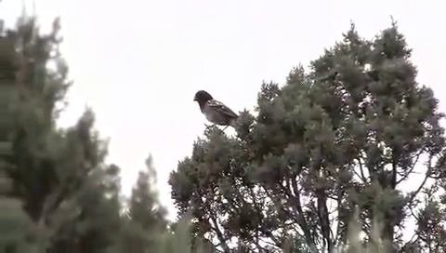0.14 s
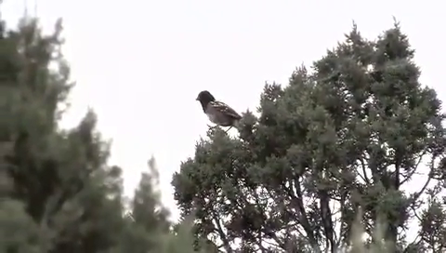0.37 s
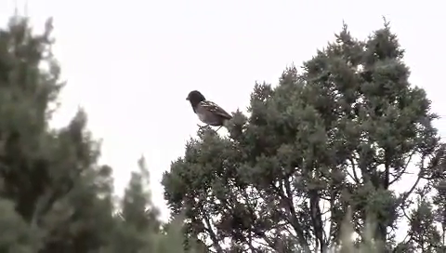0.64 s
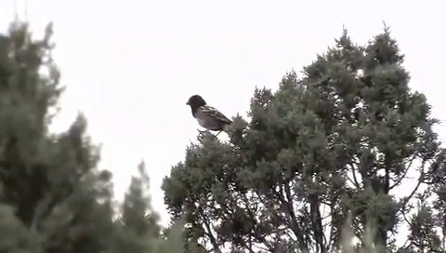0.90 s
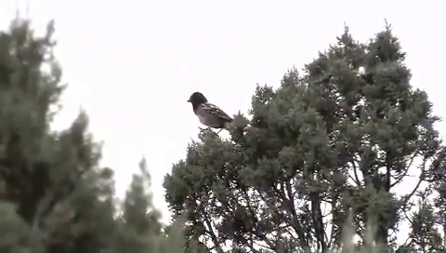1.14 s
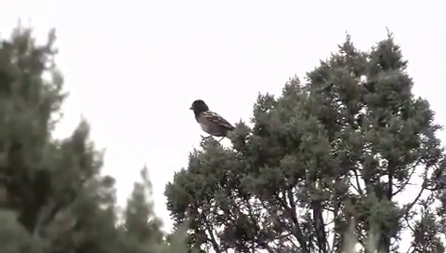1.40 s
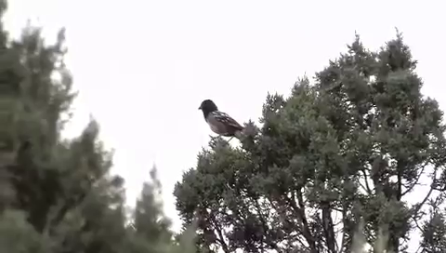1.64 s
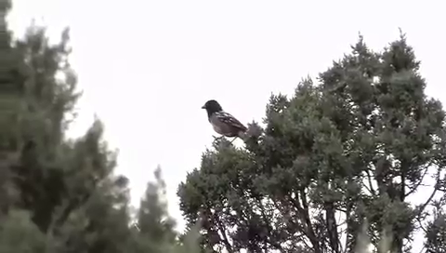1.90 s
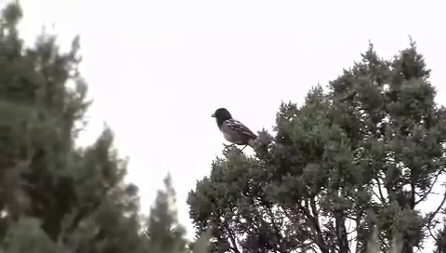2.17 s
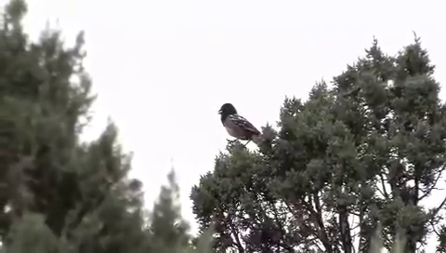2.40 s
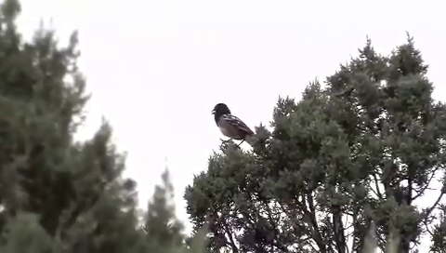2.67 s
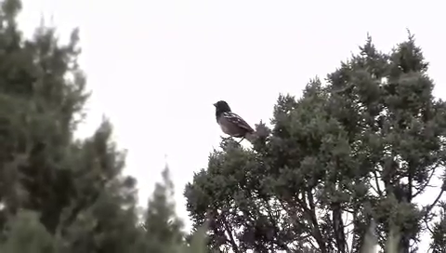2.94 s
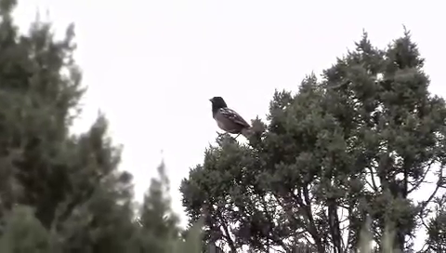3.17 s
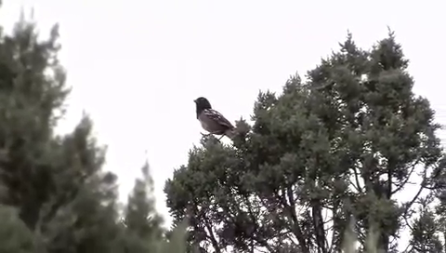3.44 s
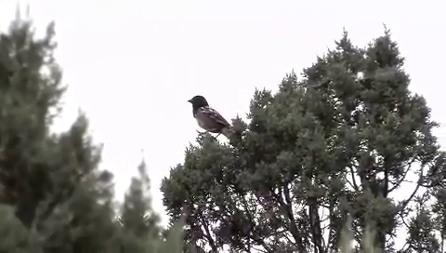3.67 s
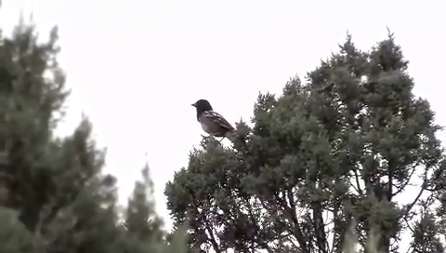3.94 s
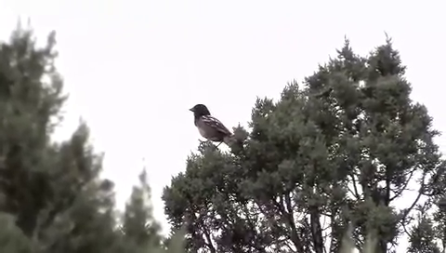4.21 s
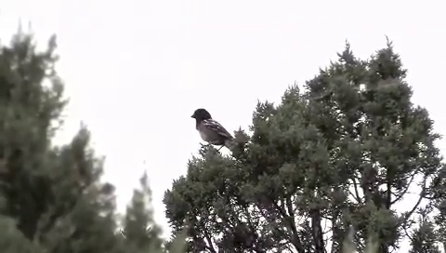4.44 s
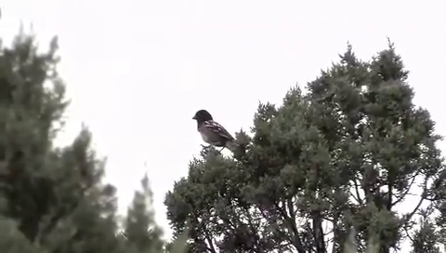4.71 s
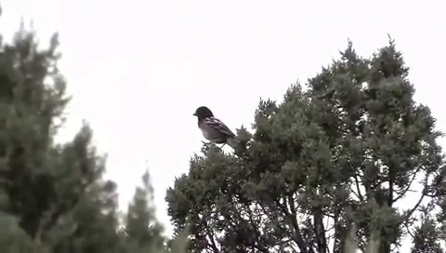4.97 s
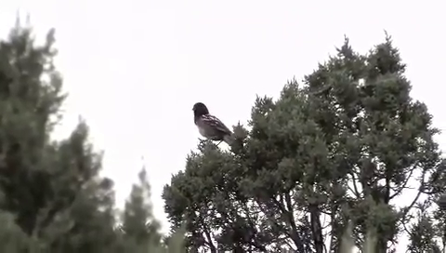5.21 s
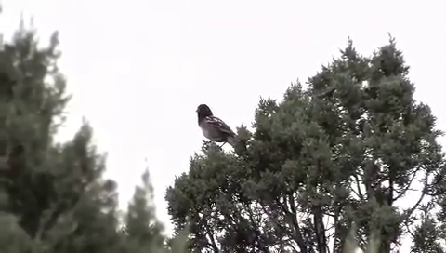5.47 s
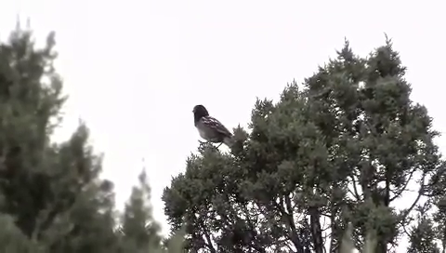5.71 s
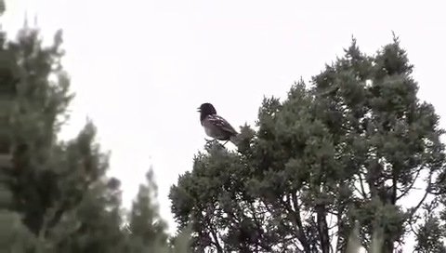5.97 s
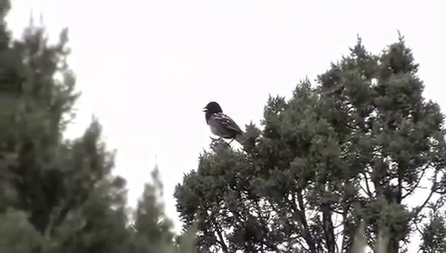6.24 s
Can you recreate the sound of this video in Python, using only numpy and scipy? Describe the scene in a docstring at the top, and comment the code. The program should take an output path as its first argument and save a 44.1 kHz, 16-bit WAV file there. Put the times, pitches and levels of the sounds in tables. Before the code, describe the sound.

A high, steady cicada trill, stronger on the right, runs throughout over faint distant traffic rumble and light air. Close to the microphone, plastic ticks and a brief whistling nylon swish come in the first second. A towhee then gives a rough, nasal mew that rises and falls. More handling clicks and creaks follow, one sharp, before a second, louder mew at the very end, echoing lightly off trees.

```python
"""Towhee and cicada by a juniper

A towhee in a juniper mews twice: two coupled voices, one in each side of its syrinx, mix into many tones.
A cicada trills steadily to the right, its ribs buckling in quick strokes that ring. Nylon swishes once:
passing threads give a gliding tone, a seam whistles and cloth hisses. The plastic body of a hand-held camera
ticks and creaks in short ringing bursts. Shaped noise makes the far traffic and light air, and a fizz above."""
import sys
import numpy as np
from scipy import signal
from scipy.fft import rfft, irfft, next_fast_len
from scipy.io import wavfile
from scipy.ndimage import uniform_filter1d, map_coordinates

SR = 44100
rng = np.random.default_rng(int(sys.argv[2]) if len(sys.argv) > 2 else 0)


def voltage_ratio(decibels):
    """Convert decibels (scalar or array-like) to amplitude ratios, 20 dB per decade."""
    exponent = np.asarray(decibels, float) / 20
    return 10 ** exponent


def digitize_waveform(pressure):
    """Quantize a signal to 16-bit integers and store it at the path in sys.argv[1].

    Rows of a 2-D input are taken as channels; values are limited to [-1, 1].
    """
    field = np.atleast_2d(pressure).T
    bounded = np.clip(field, -1, 1)
    quanta = np.round(bounded * 32767).astype(np.int16)
    wavfile.write(sys.argv[1], SR, quanta)


N = 280476  # length in samples


def unit(x):
    """Scales a sound to rms 1."""
    return x / np.sqrt(np.mean(np.abs(x) ** 2) + 1e-20)


def along(points, hz, axis=1):
    """Reads one column of a table whose first column is frequency, on a log frequency axis."""
    points = np.array(points)
    return np.interp(np.log(hz + 1), np.log(points[:, 0] + 1), points[:, axis])


def curves(rows):
    """Gives the samples that a timed table spans, and each of its columns joined up by straight lines."""
    s, *columns = np.transpose(rows)
    at = np.arange(round(s[0] * SR), min(round(s[-1] * SR), N))
    return at, [np.interp(at / SR, s, column) for column in columns]


def wobble(shape, rate):
    """Draws smooth random curves through random knots, with rate knots in every SR steps."""
    knots = rng.standard_normal((shape[0], int(shape[1] * rate / SR) + 4))
    place = np.arange(shape[1]) * rate / SR
    return np.array([map_coordinates(k, [place]) for k in knots])


def filtered(x, response):
    """Multiplies the spectrum of x by a complex response to frequency."""
    n = x.shape[-1]
    m = next_fast_len(n + 4096)  # room for ringing past the end
    return irfft(rfft(x, m) * response(np.fft.rfftfreq(m, 1 / SR)), m)[..., :n]


def modes(table, f):
    """Adds up resonances, each (f/Hz, width/Hz, level/dB), with alternating signs."""
    total = 0
    for k, (centre, width, db) in enumerate(table):
        resonance = 1j * f * width / (centre * centre - f * f + 1j * f * width)
        total = total + (-1) ** k * voltage_ratio(db) * resonance
    return total


def rush(spectrum, alike, patchy_db):
    """Makes stereo noise of rms 1 with patches of random gain, and sides as alike as the table says."""
    z = signal.stft(rng.standard_normal((2, N + 512)), nperseg=512)[2]
    field = uniform_filter1d(rng.standard_normal(z.shape[1:]), 6, 0)
    field = uniform_filter1d(field, 12, 1)
    pair = signal.istft(z * voltage_ratio(patchy_db * unit(field)), nperseg=512)[1][:, :N]

    def shares(hz):
        turn = np.arccos(np.clip(along(alike, hz), -1, 1)) / 2
        return voltage_ratio(along(spectrum, hz)) * [np.cos(turn), np.sin(turn)]

    mid, side = filtered(pair, shares)
    return unit(np.array([mid + side, mid - side]))


def foliage(x, t60):
    """Scatters echoes off the trees: a separate noise tail per side, falling 60 dB in t60 seconds."""
    t = np.arange(SR // 3) / SR
    tail = unit(rng.standard_normal((2, len(t))) * voltage_ratio(-60 * t / t60)) / np.sqrt(len(t))
    return signal.fftconvolve(x[None], tail, axes=1)[:, :N]


def throat_gain(hz):
    """The throat and beak strengthen some pitches and weaken others."""
    # throat and beak: f/Hz, level/dB
    throat = [(900, -4), (1300, -10), (2200, -1.5), (2800, 0.5), (3500, -2), (4150, 5), (4800, -5),
              (5500, -4), (6200, -17)]
    return voltage_ratio(along(throat, hz))


def mixed_tones(low_hz, gap_hz, spread, rough):
    """Two coupled voices give tones at m * low + n * gap; roughness blurs them and adds half-gap tones."""
    # tones round each overtone of the low voice: centre/gaps, width/gaps, both scaled by the spread
    clusters = [(0.1, 0.39), (0.35, 0.68), (.85, 1.93), (1, 1.9)]
    low_shake, gap_shake = wobble((2, len(rough)), rate=120) * rough
    low = 2 * np.pi * np.cumsum(low_hz + 14 * low_shake) / SR
    gap = 2 * np.pi * np.cumsum(gap_hz + 22 * gap_shake) / SR
    call, power = 0, 0
    for m, (centre, width) in enumerate(clusters, start=1):
        for n in np.arange(-3, 4.5, .5):
            size = np.exp(-.5 * ((n - centre * spread) / np.maximum(spread * width, .05)) ** 2)
            size = size * throat_gain(m * low_hz + n * gap_hz)
            if n % 1:  # half-gap tones need roughness
                size = size * 0.25 * m * rough
            flutter = voltage_ratio(1.7 * wobble((1, len(rough)), rate=34.6)[0])
            call = call + size * flutter * np.sin(m * low + n * gap + 2 * np.pi * rng.random())
            power = power + size ** 2 / 2
    return call / np.sqrt(power), low


def breath_rasp(low, low_hz):
    """Turbulent air gated by the voice smears noise round each overtone."""
    breath = wobble((4, len(low)), rate=770)
    rasp = 0
    for m in range(1, 5):
        rasp = rasp + m * throat_gain(m * low_hz * 1.235) * breath[m - 1] * np.sin(1.03 * m * low)
    return unit(rasp)


def towhee():
    """Each mew glides in pitch; tones spread as its voices part, and glides or soft notes roughen it."""
    # mews: t/s, low voice f/Hz, gap to the high voice f/Hz, relative level/dB
    mews = [
        [(2.32, 1000, 157, -62.5), (2.4, 1165, 172, -52.5), (2.51, 1285, 185, -47.5), (2.6, 1315, 181.7, -46),
         (2.71, 1332, 167.8, -45.5), (2.8, 1294, 160.4, -48.5), (2.9, 1191, 137, -49.5), (2.97, 1147, 139, -55),
         (3.08, 1046, 136, -54), (3.11, 1027, 137.6, -73)],
        [(5.91, 1005, 184, -67), (5.95, 1064, 195.8, -60), (6.02, 1220, 180.6, -48), (6.08, 1297, 183, -45.5),
         (6.14, 1341, 181.4, -43.5), (6.22, 1348, 183, -39.5), (6.26, 1352, 180, -42), (6.3, 1318, 172, -43.5),
         (6.36, 1268, 171, -45)],
    ]
    # the bird at the two microphones: f/Hz, left over right level/dB, left ahead of right phase/rad
    bird_side = [(1260, -6, 0.5), (2400, -1, 1), (3000, 6.5, .5), (4400, 13, -1.86), (6200, 1, -2.5)]
    lock_hz, wide_hz = 123.3, 161  # gaps between which the tones spread out
    held_rough, glide_rough = .12, .17  # of a held pitch, and added per 1000 Hz/s of glide
    firm_db, soft_rough = -40, .035  # added per dB below firm_db (less rough above), times spread squared
    voice = np.zeros(N)
    for mew in mews:
        at, (low_hz, gap_hz, db) = curves(mew)
        parted = np.clip((gap_hz - lock_hz) / (wide_hz - lock_hz), .15, 1)
        spread = 1.13 * parted * (low_hz / 1300) ** 0.85
        glide = np.abs(uniform_filter1d(np.gradient(low_hz) * SR, size=SR // 25)) / 1000
        rough = held_rough + glide_rough * glide + soft_rough * (firm_db - db) * spread ** 2
        rough = np.clip(rough, 0, 1)
        call, low = mixed_tones(low_hz, gap_hz, spread, rough)
        rasp = voltage_ratio(-4.5) * (0.36 + rough) * np.sqrt(spread) * breath_rasp(low, low_hz)
        voice[at] += voltage_ratio(db) * (call + rasp)

    def sides(hz):
        half = voltage_ratio(along(bird_side, hz) / 2) * np.exp(.5j * along(bird_side, hz, axis=2))
        return np.array([half, 1 / half])

    return filtered(voice, sides) + voltage_ratio(-7) * foliage(voice, t60=0.97)


def cicada():
    """Each chirp buckles the tymbal ribs in turn: a few short rings that step in pitch, with a weak octave."""
    # strokes of one chirp: start t/s, f/Hz, length t/s, relative level/dB
    strokes = [(0, 6390, .0046, -44), (.0043, 7050, .002, -51), (.0058, 6640, .0042, -42),
               (.0093, 6540, .004, -42.5), (.0122, 6150, .003, -48), (.017, 6150, .003, -56),
               (.0105, 7200, .004, -52), (.021, 7200, .004, -54)]
    chirp_rate, first_chirp = 38.55, .0074  # chirps per second, s
    count = int(N / SR * chirp_rate) + 1
    luck = rng.standard_normal((len(strokes), 3, count, 1))
    drift = 0.00033 * wobble((1, count), rate=2000)[0]  # s, one knot in about 22 chirps
    start = first_chirp + np.arange(count) / chirp_rate + drift
    t = np.arange(SR // 100) / SR
    trill = np.zeros(N + SR)
    for (after, hz, length, db), (late, detune, loud) in zip(strokes, luck):
        at = start[:, None] + after + .00003 * late
        shape = np.sqrt(np.sin(np.pi * np.clip(t / length, 0, 1)))
        turn = 2 * np.pi * hz * (1 + .004 * detune) * t
        ring = voltage_ratio(db + 1.6 * loud) * shape * (np.sin(turn) + voltage_ratio(-14.5) * np.sin(2 * turn))
        place = np.round(at * SR).astype(int).clip(0) + np.arange(len(t))
        trill += np.bincount(place.ravel(), ring.ravel(), N + SR)
    trill = trill[:N]
    rasp = 1 + 0.04 * wobble((2, N), rate=2000)  # leaves in the path roughen each side in its own way
    direct = rasp * [voltage_ratio(-8.5) * trill, np.roll(trill, 1)]
    echo = voltage_ratio(-14) * foliage(trill, t60=.12)
    return voltage_ratio(-2.0) * (direct + echo)


def seam_whistle(weave_hz, s, shakes):
    """The seam whistles breathily a fifth over the weave, up to its own top note, where it rings out."""
    pitch_shake, breath = shakes
    top_hz = 4160
    hz = np.minimum(1.5 * np.maximum.accumulate(weave_hz), top_hz)
    rise_db = 150 * (0.47 - s).clip(0)  # grows by 150 dB/s until 0.47 s
    fade_db = 248 * (s - 0.62).clip(0)  # fades by 248 dB/s after 0.62 s
    turn = 2 * np.pi * np.cumsum(hz * (1 + 0.0314 * pitch_shake)) / SR
    octave = voltage_ratio(-10) * (hz < top_hz) * np.sin(2 * turn)  # gone at the top note
    return voltage_ratio(-39 - rise_db - fade_db) * (0.22 + breath) * (np.sin(turn) + octave)


def swish():
    """Threads of the weave slip past at a rate that rises and falls with the stroke, inside a broad hiss."""
    # stroke of the cloth: t/s, weave f/Hz, weave relative level/dB, hiss level/dB
    stroke = [(.385, 1492, -80, -55), (.415, 1620, -67, -41), (.45, 1846, -42, -43),
              (.5, 2100, -40.5, -45.5), (.55, 2697, -36.5, -36), (.572, 3080, -31, -40),
              (.588, 4400, -43, -36.5), (.597, 3060, -46, -29.5), (.622, 1470, -48, -35),
              (.634, 1360, -70, -45), (.68, 1390, -80, -54), (.85, 1394, -80, -68)]
    # colour of the cloth hiss: f/Hz, relative level per Hz/dB
    cloth = [(800, -45), (1500, -14), (3000, -1.5), (4500, -8.5), (5600, 1), (7000, -1.5), (8600, -8),
             (9500, -9.5), (13000, -18.5), (15500, -35)]
    at, (weave_hz, weave_db, hiss_db) = curves(stroke)
    shake = wobble((5, len(at)), rate=400)
    weave = 2 * np.pi * np.cumsum(weave_hz * (1 + 0.037 * shake[0])) / SR
    octave = voltage_ratio(-6.5 + 2.0 * shake[2]) * (weave_hz / 3000) ** 3.0 * np.sin(2 * weave)
    tones = voltage_ratio(weave_db + 1.3 * shake[3]) * (np.sin(weave) + octave)
    tones = tones + seam_whistle(weave_hz, at / SR, (shake[1], shake[4]))
    out = np.zeros((2, N))
    left, right = rush(cloth, [(1000, 0.53)], patchy_db=-1.5)
    out[:, at] = voltage_ratio(hiss_db + 1.2 * shake[3]) * [np.roll(left, 7)[at], right[at]]
    out[:, at] += voltage_ratio([[1.5], [4.5]]) * [np.roll(tones, 7), tones]  # nearer the right microphone
    top_note = filtered(out[1], lambda f: modes([(4160, 400, 0)], f))
    return out + voltage_ratio(-9) * foliage(top_note, t60=.75)  # the top note echoes off the trees


def ticks():
    """A finger or joint slips on the shell: a short burst rings body modes near its colour, over a dull thud."""
    # ticks: t/s, relative peak level/dB, relative thud level/dB, colour f/Hz, rise t/s
    slips = [(.043, -37.5, -16, 1410, 0.0027), (.388, -32.5, -25, 2460, 0.012),
             (.421, -20, -36.5, 2860, 0.0041), (0.432, -23.5, -26.5, 3000, 0.0043),
             (.667, -35.5, -13.5, 2430, 0.0042), (.754, -27.5, -19.5, 1500, 0.00097),
             (.831, -38, -24, 1620, 0.0017), (.898, -27.5, -30, 3030, 0.0012),
             (1.008, -36.5, -12.5, 2030, 0.0023), (1.125, -38, -20, 3300, 0.01),
             (1.146, -33, -22, 3240, 0.0043), (1.15, -37, -26, 7000, .002), (3.534, -43, -14, 4500, 0.0032),
             (3.859, -47, -3.5, 1230, 0.016), (3.897, -35, -16.5, 1750, 0.0027),
             (4.029, -33, -14.5, 2570, 0.0031), (4.336, -34, -11.5, 1600, 0.013),
             (4.351, -29, -33, 2950, 0.0026), (4.3863, -9.5, -31.5, 3500, 0.00095),
             (4.392, -33.5, -13.5, 2450, 0.0078), (4.408, -35, -16.5, 1170, 0.0075),
             (4.453, -32, -28, 3000, 0.0022), (4.535, -40, -5, 1410, 0.01),
             (4.553, -23.5, -14.5, 1600, 0.0037), (4.586, -39.5, -11, 1750, 0.0046),
             (4.619, -40, -13, 2020, 0.0065), (4.668, -51, 0.5, 1460, 0.0063),
             (4.87, -48.5, -5, 2770, 0.002), (5.073, -38.5, -14.5, 2400, .0036),
             (5.267, -24.5, -27, 2600, 0.00095), (5.35, -39, -27, 2900, 0.017),
             (5.387, -34.5, -22, 2920, 0.005), (5.394, -39, -30, 8000, .0015)]
    # resonances of the camera body: f/Hz, width f/Hz, relative level/dB
    body = [(1210, 216, 4), (2230, 430, 1.5), (2750, 260, 5.5), (3125, 300, 4), (3420, 380, 1),
            (5200, 1500, -6), (6650, 1400, -8.5)]
    # resonances of the thud: f/Hz, width f/Hz, relative level/dB
    dull = [(185, 102, -6), (467, 122, -3), (732, 260, -13.5)]
    out = np.zeros((2, N + SR))
    t = np.arange(SR // 12) / SR
    for s, db, thud_db, colour_hz, rise in slips:
        shade_db = 12 + 2 * rng.standard_normal()
        u = t / max(rise, .0003)
        a, b, c, d = u * np.exp(-u) * rng.standard_normal((4, len(t)))

        def shell(f):
            near = 1 / (1 + (np.log((f + 1) / colour_hz) / 0.89) ** 2) ** 2
            return (modes(body, f) + voltage_ratio(-14.5)) * near

        def shade(f):  # begins at 700 Hz, full from 2800 Hz
            return voltage_ratio(-shade_db * np.clip(np.log2((f + 1) / 700) / 2, 0, 1))

        left, right = filtered(np.array([a, 0.63 * np.roll(a, 11) + 0.89 * b]), shell)
        right = filtered(right, shade)  # the hand shades the treble
        thud = filtered(np.array([c, 1.2 * c + 0.63 * d]), lambda f: modes(dull, f))
        ring = np.array([left, right]) / np.abs(left).max()
        both = ring + voltage_ratio(thud_db + 7.5) * thud / np.abs(thud).max()
        first = round(s * SR)
        out[:, first:first + len(t)] += voltage_ratio(db + 3.5) * both
    return out[:, :N]


def air():
    """Far traffic and light air rumble, swelling a little, with a smooth fizz of noise above."""
    # rumble and air: f/Hz, relative level per Hz/dB
    rumble = [(12, -13), (20, -13), (80, -2.5), (148, -1), (243, -2), (347, -3), (372, -3), (460, -5),
              (1530, -13.5), (1640, -13), (5600, -18), (7280, -20), (12300, -120)]
    # far insects and microphone hiss: f/Hz, relative level per Hz/dB
    fizz_colour = [(4500, -63), (5600, -54.5), (6200, -25), (7000, 4.5), (7600, -5), (8500, -5.5),
                   (12000, -7), (13000, -8.5), (14200, -9.5), (15800, -15)]
    # how alike left and right are: f/Hz, likeness (1 is the same)
    likeness = [(60, 0.054), (180, 0.16), (550, 0.16), (1650, 0.047), (4970, 0.21), (15000, 0.22)]
    swell = voltage_ratio(.3 * wobble((1, N), rate=1.5) + .7 * wobble((1, N), rate=7))
    fizz = voltage_ratio([[-62], [-58]]) * rush(fizz_colour, likeness, patchy_db=1.5)
    return voltage_ratio(-51.5) * swell * rush(rumble, likeness, patchy_db=1.09) + fizz


def scene():
    """Adds all the sources at the two microphones."""
    return towhee() + cicada() + swish() + ticks() + air()


def top_cut(x):
    """Nothing passes above the cut-off."""
    return signal.sosfilt(signal.butter(12, 15820, fs=SR, output="sos"), x)


def record(dry):
    """Gives the finished mix as the camera stores it."""
    return top_cut(dry)


dry = scene()
out = record(dry)
digitize_waveform(out)
```